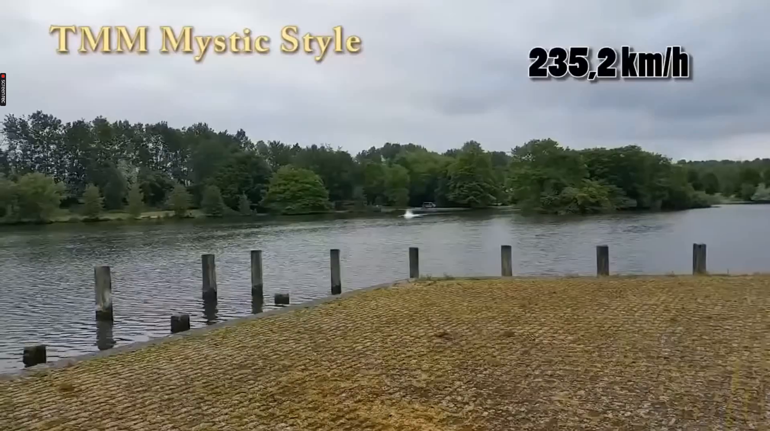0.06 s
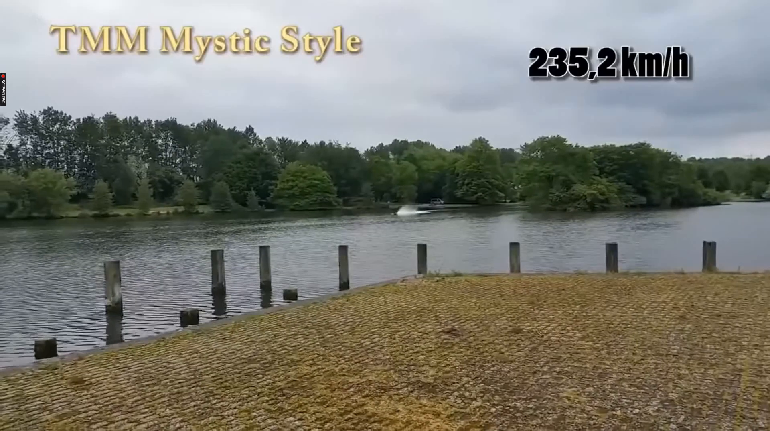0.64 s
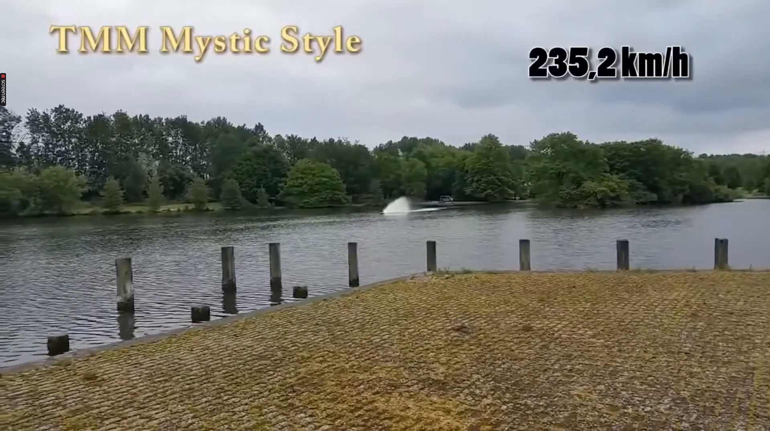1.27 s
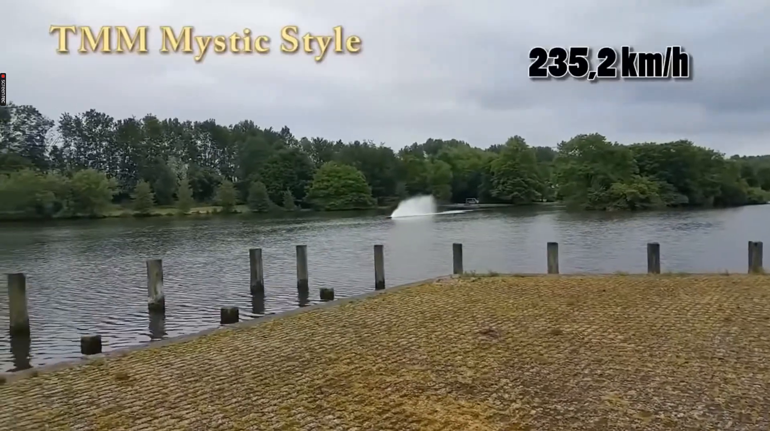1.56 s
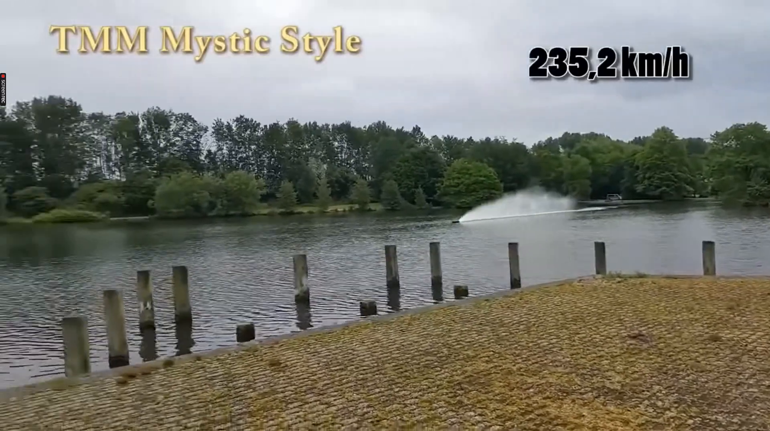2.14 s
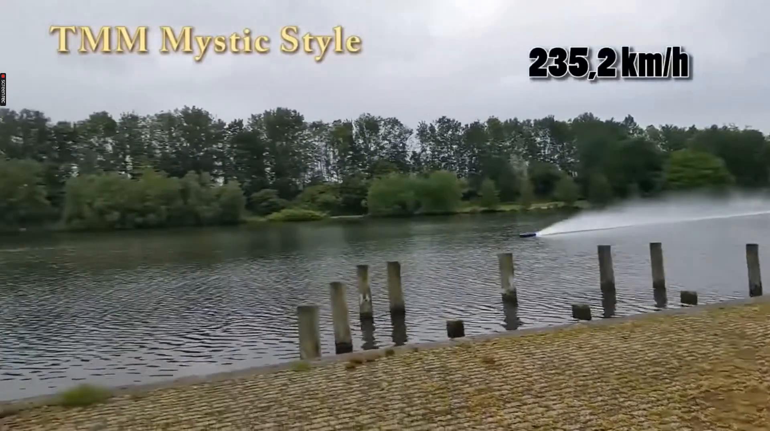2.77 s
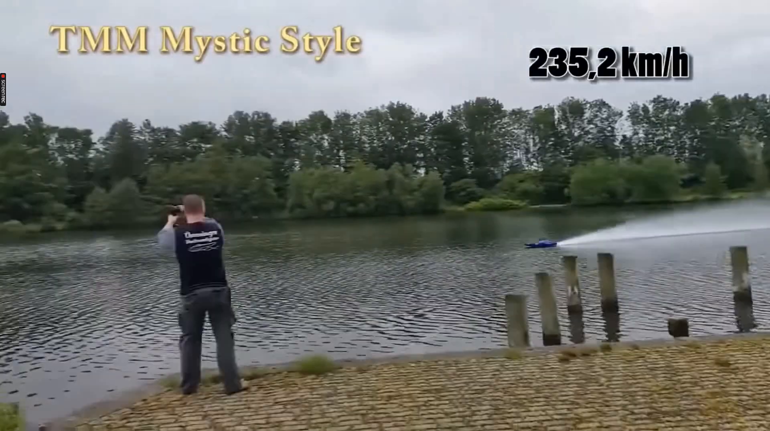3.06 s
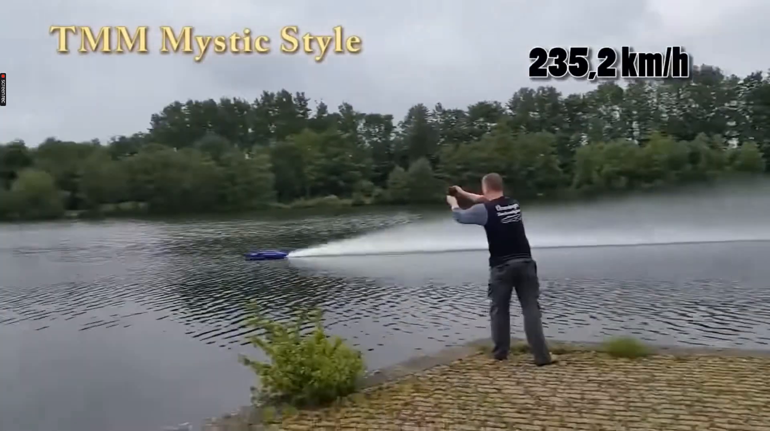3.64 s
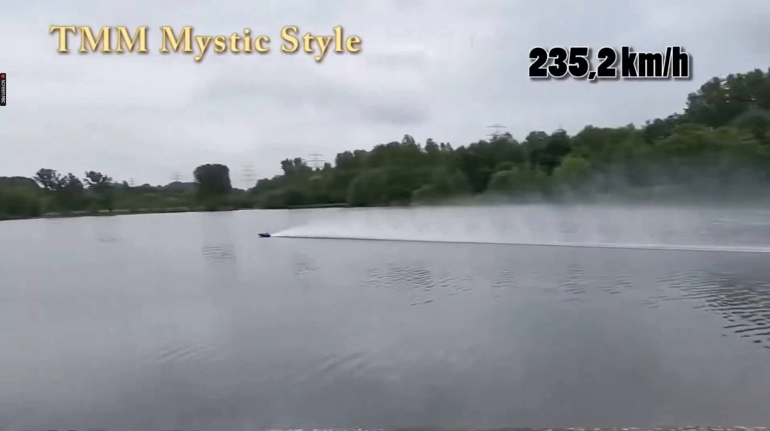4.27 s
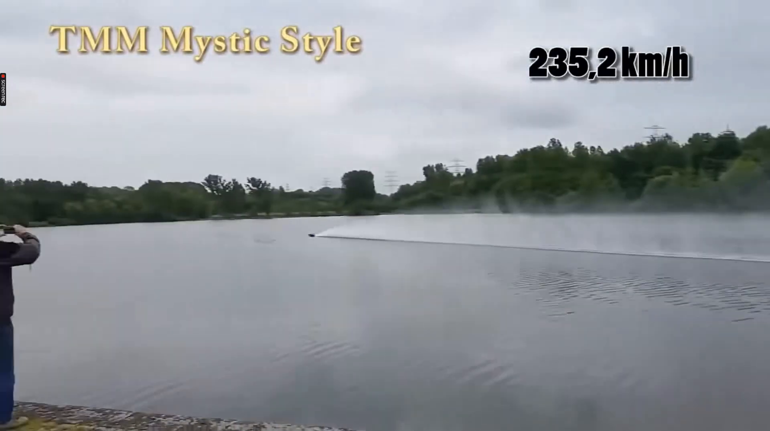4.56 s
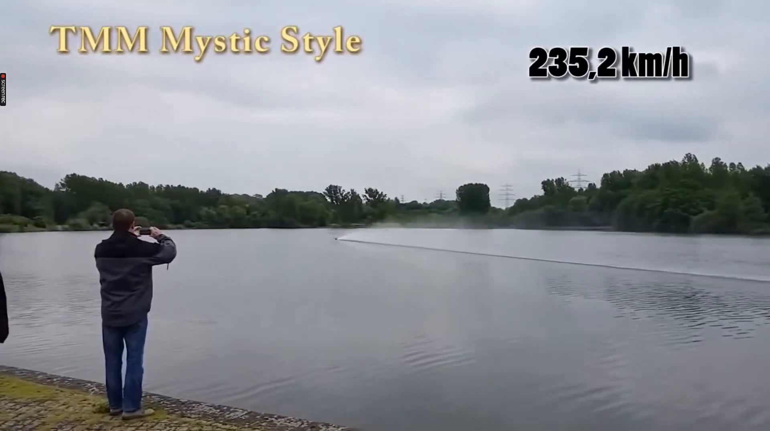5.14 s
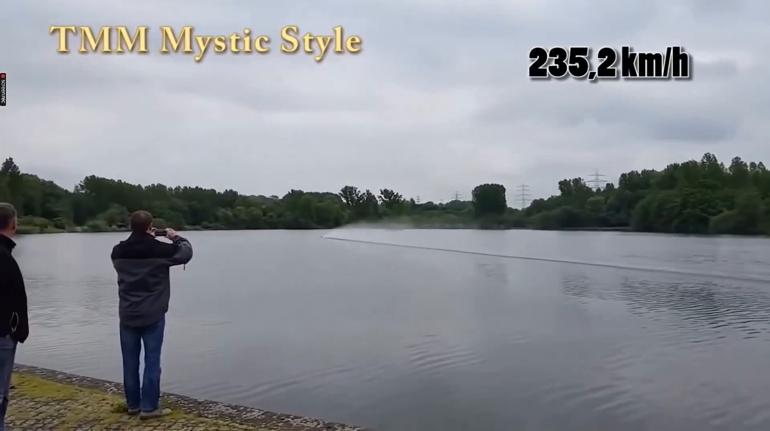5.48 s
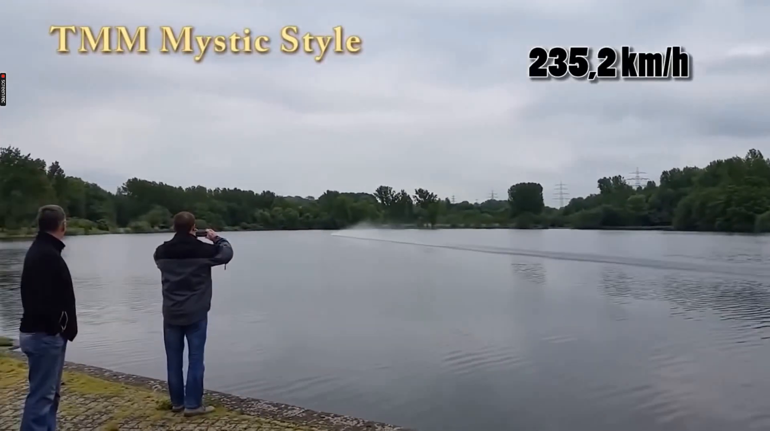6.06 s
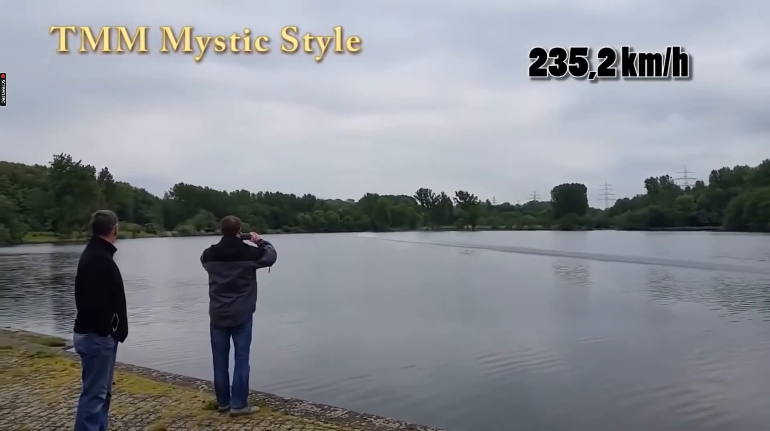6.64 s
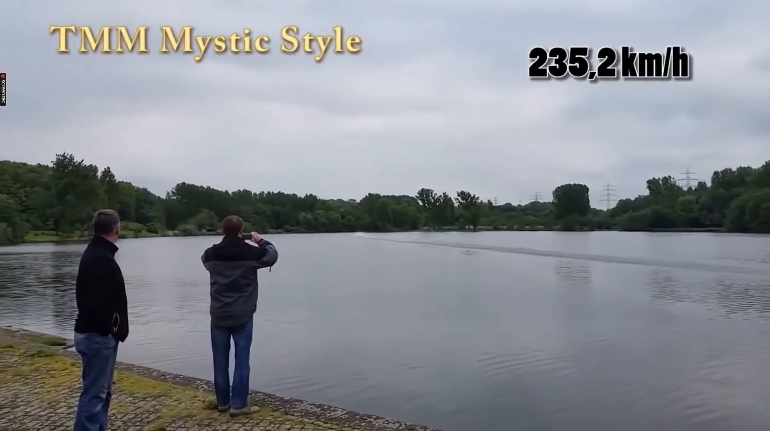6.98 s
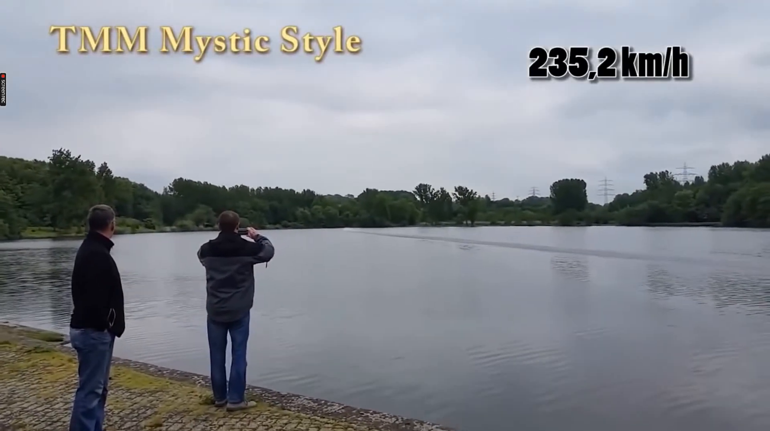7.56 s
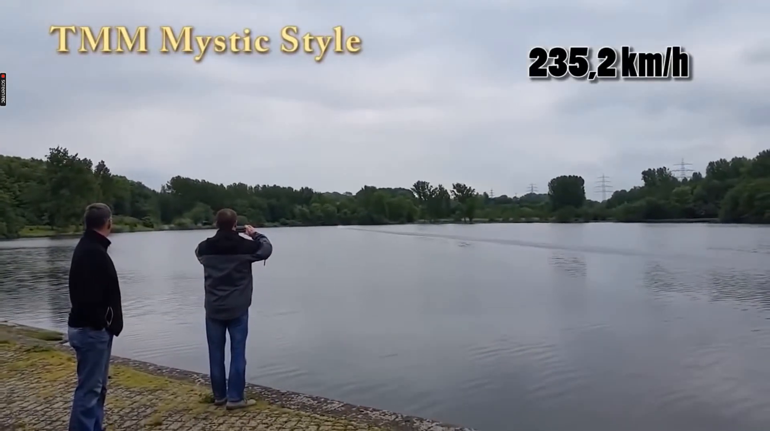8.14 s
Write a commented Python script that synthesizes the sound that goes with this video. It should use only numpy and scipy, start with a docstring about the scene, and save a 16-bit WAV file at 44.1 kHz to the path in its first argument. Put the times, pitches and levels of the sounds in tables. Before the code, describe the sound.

Low, uneven wind thumps hit the microphone at the start, over the faint hum of a distant propeller and a soft, steady rustle of lakeside trees. At about 1 second an electric model speedboat opens up. Its whine sweeps quickly upward until 1.8 seconds, then keeps climbing slowly, high and fluttering, with two close tones beating against each other. From around 2 seconds the hull rushes on the water and spray hisses in spurts. The boat races past from right to left, loudest between 3.5 and 4.6 seconds, with a bright whine, a watery roar, a low hum and sizzling spray. It then recedes, and the whine and hiss fade out by about 6.3 seconds. A faint echo from the far shore lingers until around 7.5 seconds, along with a weak, falling motor hum. Light wind and rustling remain until the end, just past 8 seconds.

```python
"""Wind thumps on the microphone over a faint propeller hum; then an electric model speedboat opens up,
races past the bank of a lake and runs off into the distance. Its twin shafts and two-bladed propellers
whine and beat against each other, the hull roars on the water and the spray hisses.
The wooded shores rustle and throw the whine back."""
import sys
import numpy as np
from scipy import signal
from scipy.io import wavfile

SR = 44100
rng = np.random.default_rng(int(sys.argv[2]) if len(sys.argv) > 2 else 0)


def wav_out(sig):
    """Save sig, one row per channel (or a flat mono array), as 16-bit PCM at SR to the path in sys.argv[1]."""
    wavfile.write(sys.argv[1], SR, np.round(np.clip(np.atleast_2d(sig).T, -1, 1) * 32767).astype(np.int16))


N = 366685
TIME = np.arange(N) / SR

START_S, PLANING_S = 0.937, 1.9   # the throttle opens; the hull is planing
CLOSEST_S, DISTANCE_M, SPEED_M_PER_S = 3.89, 35.8, 74.1   # the straight run past the bank
FULL_SHAFT_HZ, EFFORT_DB_PER_OCTAVE = 570.3, 12.5   # faster shafts are louder
FLICKER_DB = 1.2   # usual spread of a noise band's level
# angles off the bow: ahead, abeam (a range for the water), astern
MOTOR_BEARINGS_DEG, WATER_BEARINGS_DEG = (56, 96.7, 157.3), (54.3, 90, 116, 143.8)
# how each layer beams round the boat: ahead_db, abeam_db, astern_db, fade_db_per_s
SHAFT_BEAM, DRONE_BEAM = (-29.5, -32, -27.5, 9), (-23, -26.5, -26.5, 1.5)
ROAR_BEAM, WASH_BEAM = (-21, -22.5, -24.5, 4), (-30, -29.5, -31, 25)

# pitch of the two shafts as heard from the bank: time_s, first_hz, second_hz
SHAFT_RATES = [(1.1, 211.3, 209), (1.27, 279.8, 278.7), (1.45, 346, 341), (1.68, 430, 441.8),
               (1.76, 441.5, 451), (1.88, 432, 458.5), (1.96, 448, 445.3), (2.03, 448, 472.7),
               (2.15, 453, 473), (2.25, 460.6, 475.6), (2.36, 468, 481), (2.5, 480, 495.3),
               (2.62, 489, 496), (2.8, 507, 502.7), (3.0, 519.5, 514), (3.12, 525.5, 518),
               (3.28, 527, 518.2), (3.42, 520.4, 518.5), (3.52, 544.6, 531), (3.62, 546, 539.5),
               (3.69, 537, 531.3), (3.78, 545, 559.6), (3.88, 554, 552.7), (4.04, 570.7, 571.3),
               (4.2, 569.8, 589.6), (4.28, 583.3, 584), (4.45, 590.4, 598.6), (4.7, 605, 601.4),
               (4.85, 614.7, 620), (5.25, 634.2, 623.6), (5.7, 640.8, 642), (6.1, 649, 643),
               (6.35, 595, 595), (6.8, 576, 574), (7.4, 540, 547)]
# level ride of the blade tone, shaft order 2: time_s, level_db
BLADE_LEVEL = [(1.15, -48), (1.235, -34), (1.44, -33), (1.478, -40), (1.495, -20), (1.525, -36),
               (1.55, -27), (1.6, -35), (1.7, -34), (1.95, -36), (2.13, -43), (2.3, -35), (2.72, -37.5),
               (2.97, -25.5), (3.3, -34.5), (3.56, -22.5), (3.76, -24), (4.02, -27.5), (4.12, -25.5),
               (4.38, -29.5), (4.48, -35), (4.6, -26), (4.76, -26.5), (4.87, -35.5), (4.96, -24.5),
               (5.1, -32.5), (5.24, -26.5), (5.48, -32), (5.75, -44), (6.1, -48), (6.22, -56), (6.7, -70)]
# overtones of the whine: shaft_order, ahead_db, abeam_db, astern_db, fade_db_per_s,
# skirt_weight, froth_weight, pan_share
OVERTONES = [(3, -63.5, -70, -30, 15, 5.5, 0.96, 0.0068), (4, -19, -22, -24, 12.5, 2.5, 0.76, 0.12),
             (5, -68, -59, -45, 19, 4.5, 1, 0.22), (6, -18.5, -43.5, -36.5, 25, 1.5, 0.7, 1),
             (8, -30.5, -55, -80, 23, 2.8, 0.86, 0.69), (11, -45, -82.5, -81, 22, 3.9, 6, 0.31)]
# level ride of the overtones: time_s, orders_3_to_5_db, order_6_db, higher_orders_db
OVERTONE_RIDE = [(1.3, -13, -11, -21), (1.58, -3, -8, -12), (1.67, 2.5, 5.5, 9), (1.82, -3, -6.5, 1),
                 (1.95, 1.5, 0.5, 4), (2.07, 1.5, -12, 5), (2.37, 1, 2.5, 1), (2.5, -6.5, -6.5, -10),
                 (2.67, -4.5, 1.5, -15), (2.8, -2, -9.5, -8), (3.1, 0.5, 1, 3.5), (3.28, 4, 0.5, 6),
                 (3.48, 0, 2, 2.5), (3.6, -2, -13, 0.5), (3.7, -3.5, -0.5, -1), (3.9, -4, -1.5, 1.5),
                 (4.0, 5, 3, 1.5), (4.08, -2.5, -3, -7), (4.19, -6, -7, -4), (4.3, 1, -4.5, 0),
                 (4.58, 6, 4, 0), (4.8, 1, -1, -2), (5.4, -5.5, -11, -3)]
# where the whine sits, positive to the left: time_s, blade_pan_db, overtone_sweep_db
WHINE_PAN = [(1.2, 0, -2.5), (2.1, -3, -7), (2.6, 7, -19), (3.3, 12.5, -15.5), (3.55, 15, -7.5),
             (4.0, 9, 9), (4.6, 0.5, -9), (5.3, 0.5, -70), (6.5, -11, 6)]
# how hard the propellers churn: time_s, churn_share
CHURN = [(1.3, 0.5), (1.7, 0.4), (2.4, 0.34), (3.0, 0.18), (3.45, 0), (3.68, 0.9), (4.0, .65), (4.15, .95),
         (4.42, 1), (4.65, .35), (5.3, 0.34)]
# the shafts hum on as the boat coasts: time_s, level_db
COAST_LEVEL = [(6.1, -90), (6.3, -50), (6.75, -53), (7.1, -59), (7.7, -58), (8.3, -55)]
# pitch at low throttle: time_s, shaft_hz
IDLE_RATE = [(0.1, 358.7), (0.33, 404), (0.9, 409.6), (1.15, 394)]
# partials of the idling hum: shaft_order, level_db, skirt_weight, froth_weight
IDLE_PARTIALS = [(1, -48.5, .2, 0.98), (2, -50.5, 0.37, .1), (3, -59, 0.37, .2), (5, -51, 1.6, 4.4),
                 (6, -51.5, 1.3, 2.2)]

# colours of the water: frequency_hz, relative_density_db
DRONE_SPECTRUM = [(105, -0.5), (135, 1), (162, -4), (195, -1.5), (245, -4), (310, -11.5), (400, -19.5)]
ROAR_SPECTRUM = [(300, 12.5), (420, -15), (580, 11.5), (800, 9), (1150, 7), (1550, 7.5), (2000, 7.5),
                 (2450, 2), (2900, 12.5), (3700, -3), (5000, -55.5)]
WASH_SPECTRUM = [(2400, 27), (3300, 20.5), (4300, 22), (5500, 21), (7000, -17), (8300, -50.5), (10000, -69)]
SPRAY_SPECTRUM = [(8500, -29), (9800, -19.5), (11000, 15.5), (12200, 22), (13500, 18.5), (15700, 12)]
PATTER_SPECTRUM = [(3600, 3.5), (5300, 6.5), (6300, -4), (7500, -13.5)]
SIZZLE_SPECTRUM = [(5600, -2), (6600, 19), (7600, 15.5), (8800, -17), (10500, -6)]
LAUNCH_SPECTRUM = [(1100, -0.5), (1600, -3.5), (2200, 7.5), (2900, -4.5), (3700, -2), (4800, -31)]
# hiss of the plume of spray: time_s, level_db
PLUME_LEVEL = [(1.5, -79), (1.7, -59.5), (2.0, -52.5), (2.25, -36.5), (2.55, -48.5), (2.8, -40.5),
               (2.97, -31), (3.48, -26.5), (3.6, -22), (3.85, -26.5), (4.0, -20.5), (4.37, -22), (4.5, -34),
               (4.7, -37), (5.8, -40.5), (6.05, -50), (6.4, -77.5), (8.3, -89)]
# the hull skips and throws up water: peak_s, half_length_s, spray_boost_db, wash_boost_db
HULL_SKIPS = [(1.707, 0.031, 9.5, 2), (1.952, 0.055, 8, 5.5), (2.286, 0.11, -8, 11), (2.683, 0.071, 6, 7),
              (3.642, 0.045, 0.5, 7), (3.805, .02, 7, 0), (3.907, 0.018, 1.5, -1), (4.42, 0.041, 0, 5.5),
              (4.79, 0.05, 0, 4.5)]
# brief faint hisses: peak_s, half_length_s, peak_db
HISSES = [(-0.002, 0.052, -43.5), (6.924, 0.022, -68), (7.281, .015, -65), (7.434, 0.041, -56.5),
          (7.676, .02, -70)]
# stereo image of the lake's noises: frequency_hz, left_right_correlation
LAKE_IMAGE = [(150, 1), (650, 0.96), (1000, 0.046), (1500, -0.4), (2150, 0.36), (2900, -0.14),
              (4000, 0.035), (8000, -0.3), (13000, -0.15)]

# reflections from bank and trees: delay_s, gain_db
BANK_ECHOES = [(0.046, -27), (.11, -18.5), (0.189, -16.5), (.47, -19)]
# the whine thrown back by the far shore: time_s, blade_hz, ride_db
FAR_ECHO = [(5.75, 821, -52.5), (6.2, 845, -51.5), (6.6, 870, -57), (7.0, 897, -61), (7.35, 913, -63),
            (8.3, 940, -95)]
# colours of that echo's blur, the shore's rustle and a tick: frequency_hz, relative_density_db
BLUR_SPECTRUM = [(1150, -19), (1350, 7), (1550, -13), (1750, -1), (1950, -19)]
RUSTLE_SPECTRUM = [(200, 21), (420, 1), (550, 10), (900, 10.5), (1400, 9), (1900, 6.5), (2400, 1.5),
                   (3200, -10.5), (4200, -7), (5200, -109), (7000, -13)]
TICK_SPECTRUM = [(3200, -1), (4200, 4), (5500, -13)]

# bed of breeze on the microphone: time_s, strength_db, pan_db
BREEZE = [(0, -26.5, -4), (1.0, -28, -6.5), (1.5, -28.5, -10.5), (2.05, -37, 2.5), (3.4, -41.5, 1),
          (3.9, -39, 15), (4.5, -30.5, 5.5), (5.3, -31.5, 6), (7.0, -41.5, 2), (8.3, -42.5, 1)]
# gusts on top of it: peak_s, half_length_s, strength_db, pan_db
GUSTS = [(0.005, 0.0087, 0, 22), (0.061, 0.023, -9.5, 27), (0.115, 0.013, -18, -22),
         (0.217, 0.053, -18.5, -10.5), (0.311, 0.0056, -8.5, 15), (0.359, 0.017, -15.5, -3),
         (0.468, 0.079, -24, 3), (0.663, 0.015, -14, 25), (0.84, 0.056, -12.5, -10),
         (0.895, 0.0094, -16, -10), (.947, 0.006, -26, 13), (1.051, 0.01, -20.5, 22),
         (1.165, 0.0096, -20, 20), (1.215, .009, -28, 22), (1.319, 0.037, -16, -26),
         (1.473, 0.0058, -13.5, -40), (1.656, 0.063, -23.5, -14), (1.721, 0.013, -19.5, -3),
         (1.953, 0.0078, -23, 23), (3.978, 0.046, -21.5, 23), (4.175, 0.055, -24, 23),
         (4.761, 0.056, -32, -32), (5.04, 0.024, -15, 27), (5.281, 0.029, -29, 19),
         (5.752, 0.015, -21, -21), (5.982, 0.032, -36, 16), (6.18, 0.022, -31, 23), (6.372, 0.072, -38, 24),
         (7.89, 0.016, -28.5, 26)]
# colours of the wind: frequency_hz, relative_density_db
THUMP_SPECTRUM = [(20, -27), (32, -9), (48, 3.5), (66, 2), (95, 4), (135, -11)]
FLUTTER_SPECTRUM = [(70, -7), (105, -5.5), (145, 0), (200, -6), (260, -14.5), (330, -20), (480, -43.5)]
SLAP_SPECTRUM = [(250, -6), (600, -9), (1400, -32)]
# stereo image of the wind: frequency_hz, left_right_correlation
WIND_IMAGE = [(30, 0.22), (70, 0.37), (140, 0.81), (280, 0.37)]


def whine(wander=0.003007, stutter_db=1.8, surge_db=6.5):
    """Two drives beat; blade strokes stress the even orders, and churning adds grit and stutter."""
    churn, = in_time(CHURN)
    blade_db, = in_time(BLADE_LEVEL)
    coast_db, = in_time(COAST_LEVEL)
    blade_pan_db, sweep_db = in_time(WHINE_PAN)
    low_db, sixth_db, high_db = in_time(OVERTONE_RIDE)
    # the load varies as the hull skips
    first, second = (turning(hz * (1 + wander * drift(21.3))) for hz in in_time(SHAFT_RATES))
    slip = .18 * churn * drift(35)
    first, second = first + slip, second + slip
    skirt, froth = .12 + .2 * churn, .12 + .99 * churn
    bite_db = stutter_db * churn * drift(35)   # the blades bite and lose their grip
    blade = partial(first, skirt, .21 * froth, order=2, twin=second, twin_db=-11)
    out = from_db(blade_db + .5 * bite_db) * panned(blade_pan_db) * blade
    for order, *beam, skirt_weight, froth_weight, pan_share in OVERTONES:
        ride_db = low_db if order < 6 else sixth_db if order == 6 else high_db
        gain = from_db(bite_db + ride_db) * radiated(MOTOR_BEARINGS_DEG, beam)
        overtone = partial(second, skirt_weight * skirt, froth_weight * froth, order=order, twin=first)
        out += gain * panned(-3 + pan_share * sweep_db) * overtone
    surge = from_db(surge_db * swell(4.384, .14))   # the shaft tone swells just after the pass
    driven = planing() * radiated(MOTOR_BEARINGS_DEG, SHAFT_BEAM) * surge
    shaft = partial(second, .8 * skirt, ripple_db=.5, width_rad=.073, twin=first)
    out += np.hypot(driven, from_db(coast_db)) * shaft
    return out * np.clip((TIME - START_S) / .068, 0, 1)


def partial(angle, skirt, froth=0, order=1, ripple_db=2.1, width_rad=.057, twin=None, twin_db=-6):
    """One stereo tone fluttering over the ripples; churning adds a narrow noise skirt and wide froth."""
    phase = order * angle
    spread = width_rad * drift(32) * np.array([[1], [-1]])
    tone = np.sin(phase + spread) * from_db(ripple_db * drift(32))
    if twin is not None:
        tone = tone + from_db(twin_db) * np.sin(order * twin)
    narrow = noise_around(phase, 70)
    wide = np.array([noise_around(phase, 260) for ear in range(2)])
    return rms_one(tone + skirt * narrow + froth * wide)


def idle():
    """Far out, the propeller hums at low throttle until the run begins."""
    shaft_hz, = in_time(IDLE_RATE)
    angle = turning(shaft_hz)
    hum = sum(from_db(level_db) * partial(angle, skirt, froth, order=order)
              for order, level_db, skirt, froth in IDLE_PARTIALS)
    return hum * np.interp(TIME, [0, .1, 1.05, 1.2], [0, 1, 1, 0])


def water(spurt_db=1.2, roar_spurt_db=3.3, patter_db=-17):
    """The hull drones and roars, the wake washes, and fine spray hisses and patters back down."""
    plume_db, = in_time(PLUME_LEVEL)
    churn, = in_time(CHURN)
    spray_db = wash_db = spurt_db * churn * drift(20)
    for peak_s, half_s, spray_boost_db, wash_boost_db in HULL_SKIPS:
        spray_db = spray_db + spray_boost_db * swell(peak_s, half_s)
        wash_db = wash_db + wash_boost_db * swell(peak_s, half_s)
    hisses = sum(from_db(peak_db) * swell(peak_s, half_s) for peak_s, half_s, peak_db in HISSES)
    drone = water_gain(DRONE_BEAM) * banded_noise(DRONE_SPECTRUM, 16)
    spurts = from_db(roar_spurt_db * churn * drift(25))
    roar = water_gain(ROAR_BEAM) * spurts * banded_noise(ROAR_SPECTRUM, 13)
    wash = water_gain(WASH_BEAM) * from_db(wash_db) * banded_noise(WASH_SPECTRUM, 32)
    plume = from_db(plume_db + spray_db)
    patter = from_db(patter_db) * plume * banded_noise(PATTER_SPECTRUM, 23)
    spray = (plume + hisses) * banded_noise(SPRAY_SPECTRUM, 23, flicker_db=1)
    body = planing() * (drone + roar * panned(-.2) + wash * panned(-6.5))
    return body + spray * panned(.71) + patter


def hull_hum(pitch_hz=162, width_hz=14):
    """Chop beating on the hull keeps one low mode humming while the boat is close."""
    hum = rms_one(noise_around(2 * np.pi * pitch_hz * TIME, width_hz))
    return from_db(-26.5) * hum * swell(3.66, .22)


def sizzle(falloff=3.8):
    """The bright edge of the spray, heard only close by because the air soon absorbs it."""
    _, boat_db = course()
    return from_db(-34 + falloff * boat_db) * planing() * banded_noise(SIZZLE_SPECTRUM, 21)


def launch():
    """The propellers slip and churn up the water before the hull gathers speed."""
    return from_db(-42) * swell(1.48, .3) * panned(-4.5) * banded_noise(LAUNCH_SPECTRUM, 13)


def planing():
    """The hull lifts onto the plane: 0 at rest, 1 at speed."""
    return np.clip((TIME - START_S) / (PLANING_S - START_S), 0, 1) ** .52


def course():
    """The pass-by: the listener's angle off the bow, and the boat's gain from distance and effort."""
    shaft_hz = np.mean(in_time(SHAFT_RATES), axis=0)
    along_m = SPEED_M_PER_S * (TIME - CLOSEST_S)
    near_db = -20 * np.log10(np.hypot(along_m, DISTANCE_M) / DISTANCE_M)
    effort_db = EFFORT_DB_PER_OCTAVE * np.log2(shaft_hz / FULL_SHAFT_HZ)
    return np.degrees(np.arctan2(DISTANCE_M, -along_m)), near_db + effort_db


def radiated(bearings_deg, beam):
    """Gain of a layer beamed unevenly round the boat; from astern it fades behind the spray."""
    *levels_db, fade_db_per_s = beam
    bearing_deg, boat_db = course()
    astern_s = np.cumsum(bearing_deg > bearings_deg[-1]) / SR
    return from_db(boat_db + np.interp(bearing_deg, bearings_deg, levels_db) - fade_db_per_s * astern_s)


def water_gain(beam):
    """Water noise holds its abeam level over a broad arc to the side."""
    ahead_db, abeam_db, astern_db, fade_db_per_s = beam
    return radiated(WATER_BEARINGS_DEG, (ahead_db, abeam_db, abeam_db, astern_db, fade_db_per_s))


def bank_echoes(motor, ear_lag_s=.00019):
    """Late copies from bank and trees trail the whine, each from a direction of its own."""
    out = np.zeros((2, N))
    for delay_s, gain_db in BANK_ECHOES:
        lag_s = ear_lag_s * rng.uniform(-1, 1)
        for ear, late_s in enumerate((delay_s + lag_s / 2, delay_s - lag_s / 2)):
            out[ear] += from_db(gain_db) * np.interp(TIME - late_s, TIME, motor[ear], left=0)
    return out


def far_shore():
    """Two rising tones in a blur of noise play the opening whine returning from across the lake."""
    blade_hz, ride_db = in_time(FAR_ECHO)
    angle = turning(blade_hz)
    blade = from_db(-5) * partial(angle, skirt=1.2)
    octave = from_db(-2) * partial(angle, skirt=2, froth=1, order=2)
    blur = from_db(9) * banded_noise(BLUR_SPECTRUM, 14)
    return from_db(ride_db) * (blade + octave + blur) * np.interp(TIME, [5.4, 5.8], [0, 1])


def wind(lump_db=2, ear_lump_db=1.5, calm_db=-32):
    """Lumpy rumble at the microphone ports; gusts hit one side harder, and strong ones are brighter."""
    breeze_db, breeze_pan_db = in_time(BREEZE)
    power = (from_db(breeze_db) * panned(breeze_pan_db)) ** 2
    for peak_s, half_s, strength_db, pan_db in GUSTS:
        power += (from_db(strength_db) * panned(pan_db) * swell(peak_s, half_s)) ** 2
    lumps_db = lump_db * drift(43) + ear_lump_db * np.array([drift(13) for ear in range(2)])
    gust = np.sqrt(power) * from_db(lumps_db - calm_db)
    thumps = from_db(1.66) * gust ** .54 * banded_noise(THUMP_SPECTRUM, 22, WIND_IMAGE)
    flutter = from_db(-2.5) * gust ** .89 * banded_noise(FLUTTER_SPECTRUM, 13.2, WIND_IMAGE, 3)
    return from_db(calm_db) * (thumps + flutter)


def wind_slap():
    """An early gust hits the left port with a short slap."""
    return from_db(-24) * swell(.0458, .0034) * panned(20) * banded_noise(SLAP_SPECTRUM, 23, WIND_IMAGE)


def shore_rustle():
    """The wooded shore lays a soft, steady rustle under everything."""
    return from_db(-42.5) * panned(-3) * banded_noise(RUSTLE_SPECTRUM, 10, flicker_db=.6)


def tick():
    """One soft tick over the quiet lake."""
    return from_db(-57) * swell(7.29, .008) * banded_noise(TICK_SPECTRUM, 19)


def banded_noise(spectrum, flicker_hz, image=LAKE_IMAGE, flicker_db=FLICKER_DB):
    """Stereo noise of rms 1 in narrow bands, each with its own level, flicker and width."""
    low_hz, high_hz = spectrum[0][0], min(spectrum[-1][0], .45 * SR)
    edges = np.geomspace(low_hz, high_hz, max(7, round(3 * np.log2(high_hz / low_hz))))
    out, white = 0, rng.standard_normal((2, 2, N))
    for k, (low, high) in enumerate(zip(edges, edges[1:])):
        band = signal.butter(2, [low, high], "band", fs=SR, output="sos")
        mid, side = signal.sosfilt(band, white[k % 2])
        centre_hz = np.sqrt(low * high)
        alike = np.clip(at_hz(image, centre_hz), -1, 1)
        gain = from_db(at_hz(spectrum, centre_hz) + flicker_db * drift(flicker_hz))
        out = out + gain * (np.sqrt(1 + alike) * mid + np.sqrt(1 - alike) * side * [[1], [-1]])
    return rms_one(out)


def noise_around(phase, width_hz):
    """A band of noise that follows a tone's pitch."""
    return drift(width_hz) * np.sin(phase) + drift(width_hz) * np.cos(phase)


def drift(rate_hz):
    """Slow random modulation of spread 1: noise through a double one-pole low-pass, run at SR / 8."""
    pole = np.exp(-16 * np.pi * rate_hz / SR)
    white = rng.standard_normal(N // 8 + 8002)
    slow = signal.lfilter([1], [1, -2 * pole, pole * pole], white)[8000:]
    return np.interp(np.arange(N) / 8, np.arange(len(slow)), rms_one(slow))


def swell(peak_s, half_s):
    """A bell-shaped envelope of height 1."""
    return np.exp(-.5 * np.minimum(((TIME - peak_s) / half_s) ** 2, 100))


def turning(hz):
    """Angle of something that turns at this rate."""
    return 2 * np.pi * np.cumsum(hz) / SR


def panned(pan_db):
    """Constant-power stereo gains; positive is left."""
    gains = from_db(np.array([[.5], [-.5]]) * pan_db)
    return gains / np.sqrt(np.mean(gains ** 2, axis=0))


def in_time(rows):
    """Each column of an automation curve, sample by sample."""
    time_s, *columns = np.transpose(rows)
    return [np.interp(TIME, time_s, column) for column in columns]


def at_hz(points, hz):
    """Read a curve on a log-frequency axis."""
    frequency_hz, values = np.transpose(points)
    return np.interp(np.log(hz), np.log(frequency_hz), values)


def from_db(db):
    """Decibels to gain."""
    return 10 ** (np.asarray(db) / 20)


def rms_one(x):
    """Scale to rms 1."""
    return x / np.sqrt(np.mean(x ** 2) + 1e-20)


def scene():
    """The boat and its echoes up front, then churned water, over a bed of shore and wind."""
    motor = whine() + idle()
    shore = shore_rustle()
    echoes = bank_echoes(motor) + far_shore()
    wake = launch() + water() + sizzle() + hull_hum()
    return motor + echoes + wake + shore + wind() + wind_slap() + tick()


def record(dry, ceiling=.9, cutoff_hz=15800):
    """A soft clip rounds off the strongest gusts, and a steep low-pass trims the top."""
    rounded = dry / (1 + (dry / ceiling) ** 6) ** (1 / 6)
    return signal.sosfilt(signal.ellip(10, .2, 80, cutoff_hz, fs=SR, output="sos"), rounded)


dry = scene()
out = record(dry)
wav_out(out)
```